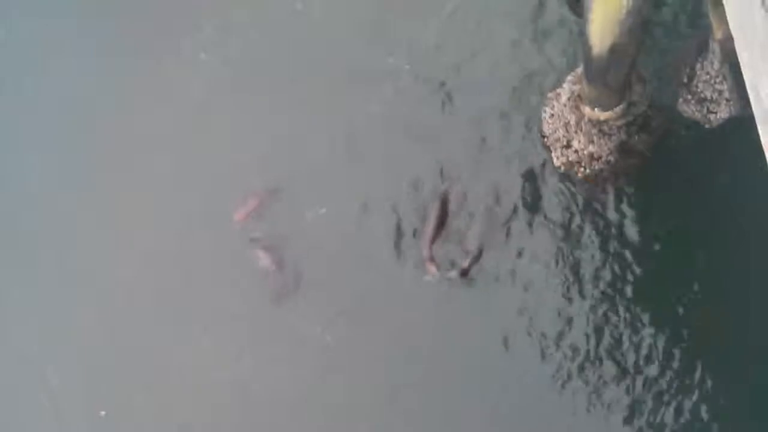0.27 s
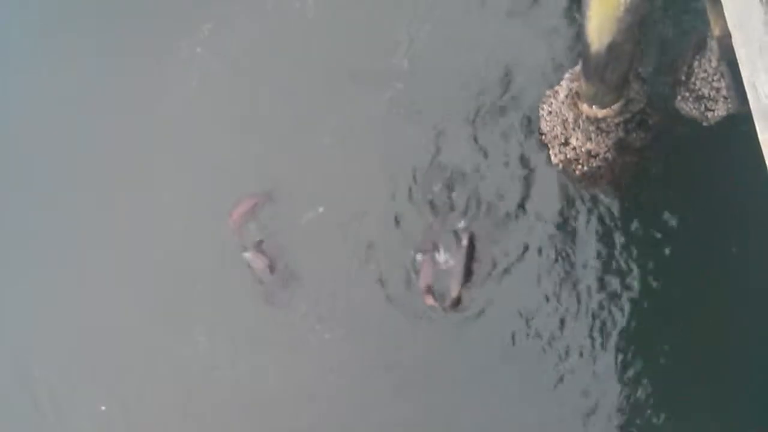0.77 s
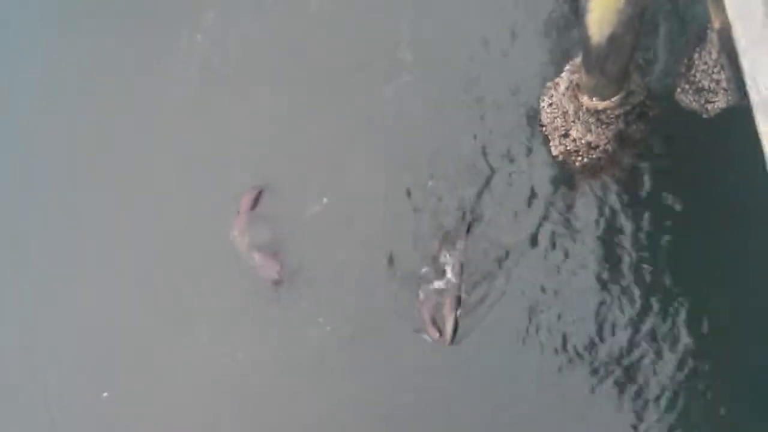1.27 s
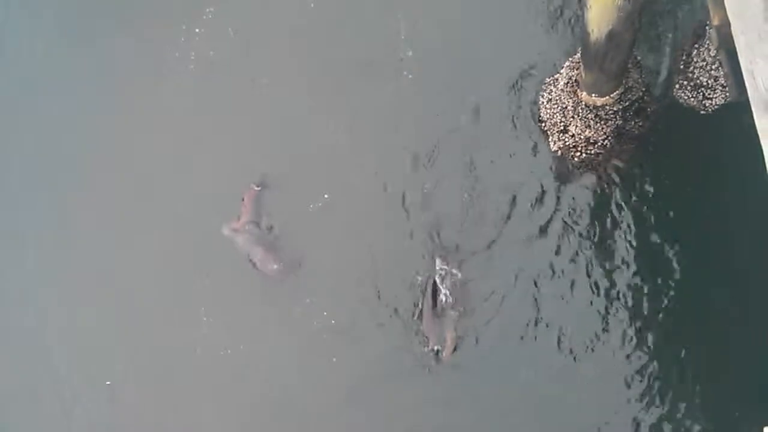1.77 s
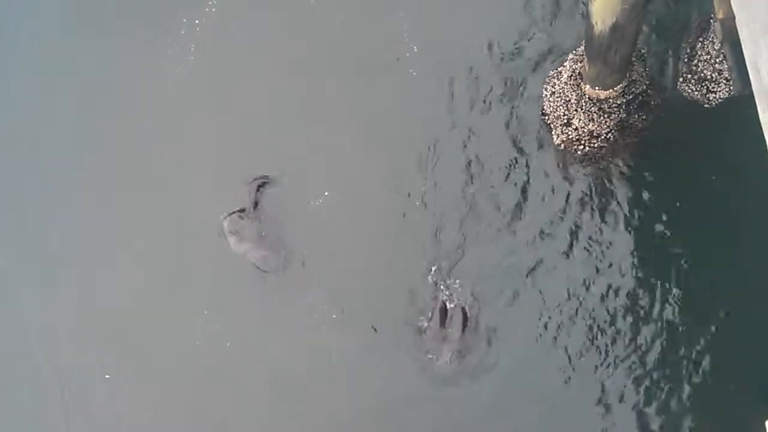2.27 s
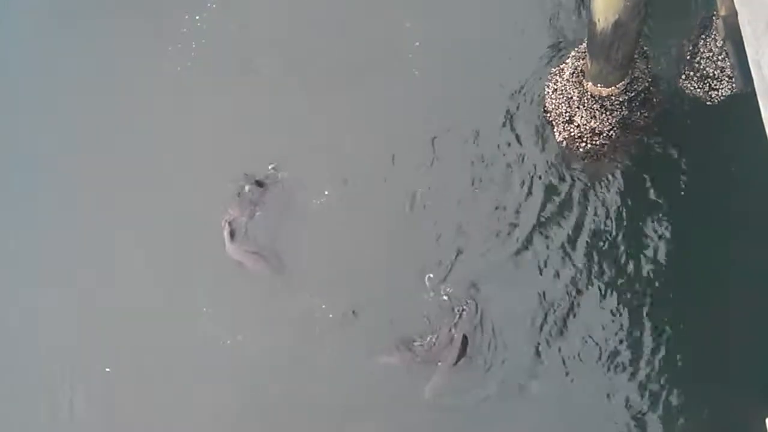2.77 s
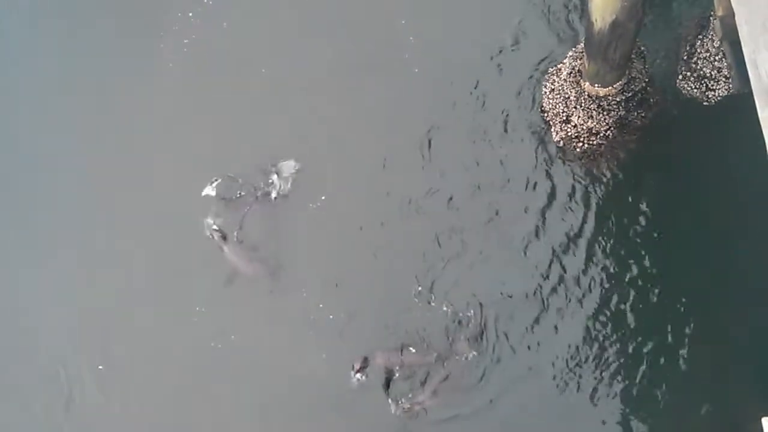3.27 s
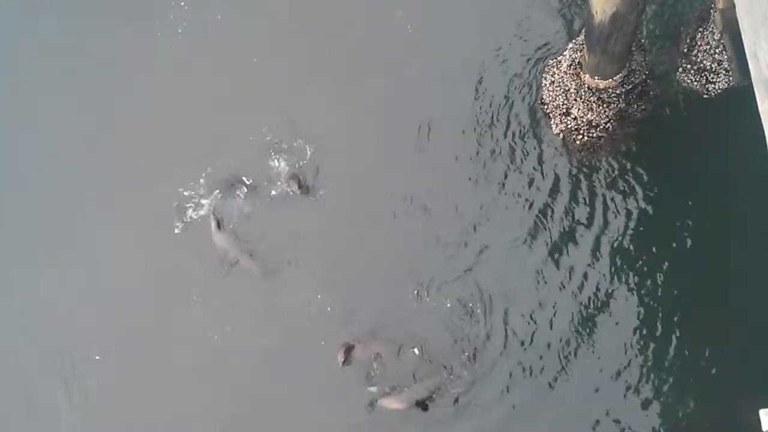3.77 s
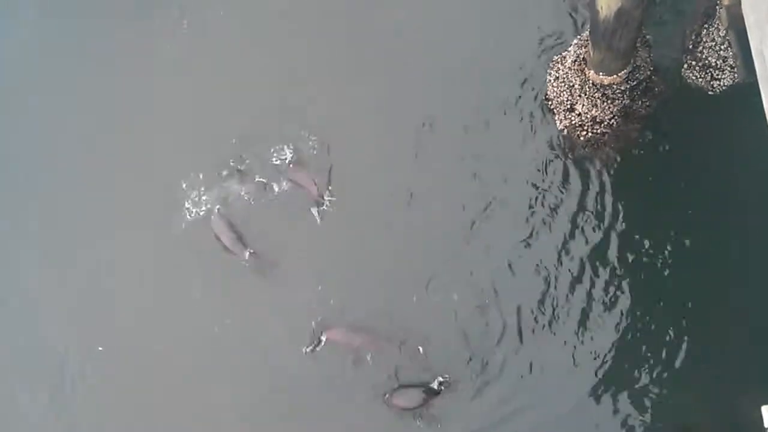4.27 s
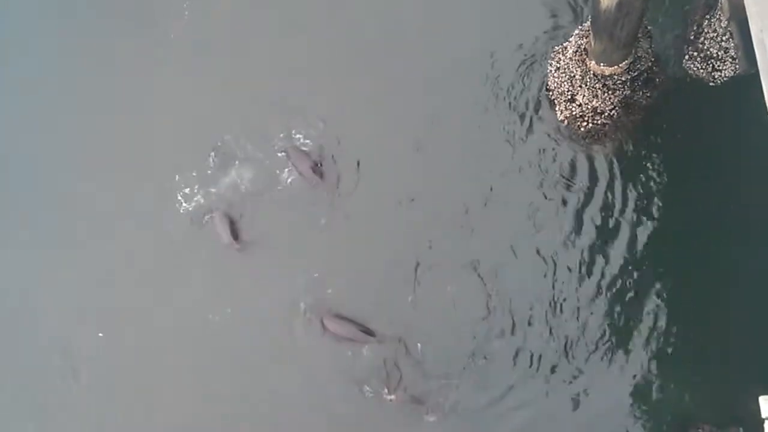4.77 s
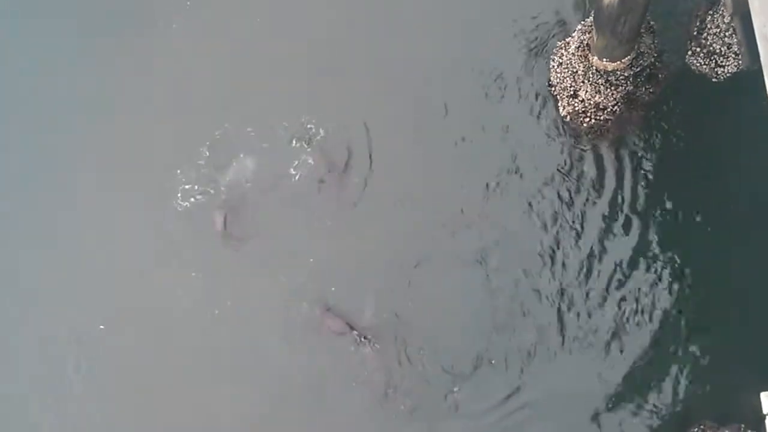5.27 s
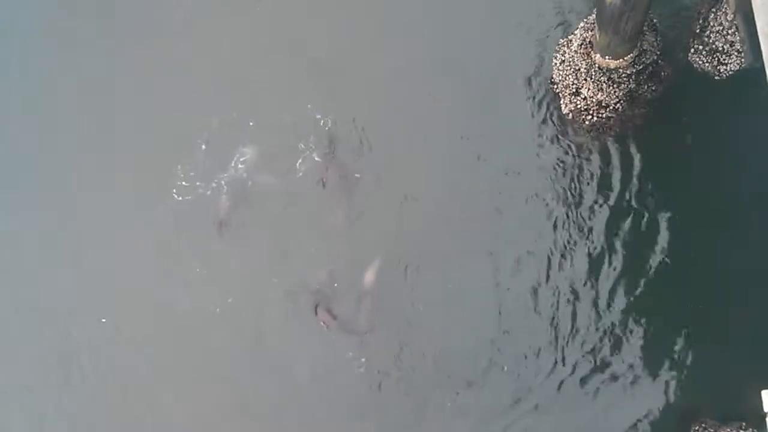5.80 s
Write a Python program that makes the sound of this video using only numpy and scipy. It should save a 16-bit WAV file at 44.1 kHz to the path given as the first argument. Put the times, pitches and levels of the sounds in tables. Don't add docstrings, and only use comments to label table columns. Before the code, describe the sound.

Small splashes and droplets under a pier, then one blaring mid-low horn tone that ducks partway through, followed by bubbling splashes and a wave slap.

```python
import sys
import numpy as np
from scipy import signal
from scipy.fft import rfft, irfft, next_fast_len
from scipy.io import wavfile
from scipy.ndimage import uniform_filter1d

SR = 44100
rng = np.random.default_rng(int(sys.argv[2]) if len(sys.argv) > 2 else 0)


def boost(x):
    u = np.asarray(x, float) / 20
    return 10 ** u


def generate_wav(signal):
    frames = np.transpose(np.atleast_2d(signal))
    scaled = np.clip(frames, -1, 1) * 32767
    pcm = np.round(scaled).astype(np.int16)
    wavfile.write(sys.argv[1], SR, pcm)


N = 266275
M = next_fast_len(N, True)
T = np.arange(N) / SR
HZ = np.fft.rfftfreq(M, 1 / SR)

# time_s, level_db
HUM_CURVE = [(.1, -57.5), (1.3, -48.5), (2.0, -58.5), (2.6, -65.5), (4.5, -70), (5.5, -57.5), (6.04, -68)]
# time_s, firing_hz, level_db
ENGINE_FIRST = [(.12, 157, -54), (.7, 154, -56), (.97, 152.9, -49.5), (1.12, 157.5, -53),
                (1.53, 169, -42.5), (1.66, 175.1, -55), (2.2, 187.3, -55.5), (2.6, 197, -70)]
ENGINE_SECOND = [(2.6, 122.3, -70), (2.75, 128, -58), (3.2, 136.3, -63.5), (3.49, 143, -51),
                 (3.84, 149.2, -46), (4.25, 154.2, -54)]
ENGINE_THIRD = [(4.4, 190, -54.5), (4.55, 178.7, -54.5), (4.83, 179.7, -55.5), (5.25, 178, -47.5),
                (5.53, 178.1, -49), (5.65, 181.8, -53.5), (6.04, 182.3, -51)]
# time_s, level_db
RUMBLE_CURVE = [(.3, -47.5), (1.11, -49.5), (1.4, -55), (2.1, -58.5), (3.3, -57.5), (3.51, -47),
                (3.66, -53), (4.3, -55), (4.7, -58), (6.04, -55.5)]
# freq_hz, density_db
RUMBLE_SPECTRUM = [(13, -59), (22, -29), (51, -13), (91, -5.5), (118, 0), (162, -3), (183, -11), (204, -7),
                   (320, -14), (420, -39.5), (700, -120)]
RUMBLE_UPPER_DB, RUMBLE_CALM_DB = -9.5, -71.5

# freq_hz, density_db
WATER_SPECTRUM = [(200, -30), (300, -0.5), (500, 0.5), (1000, -4.5), (1800, -10), (2150, -13), (3250, -20),
                  (4000, -13.5), (4800, -7.5), (5600, -14), (6600, -9.5), (7400, -5), (8400, -2),
                  (9200, -6.5), (11000, -12.5), (15800, -21.5)]
# peak_s, spray_db, dying_s, heaviness_db
SURFACINGS = [(.154, -51, 0.43, 6.5), (.407, -48, 0.095, 5), (.751, -58.5, .45, 12.5),
              (.925, -46.5, .185, 6), (1.098, -46.5, .14, 6.5), (1.253, -53, 0.12, 3.5),
              (1.4, -56.5, 0.11, -12), (2.2, -62.5, .1, 5), (2.879, -58, 0.17, -17),
              (3.077, -72.5, 0.058, 16), (3.13, -47, 0.14, -23), (3.23, -45.5, 0.27, 0.5),
              (3.37, -39, 0.17, -1.5), (3.616, -47, 0.098, -1), (3.743, -48, 0.14, 1.5),
              (3.829, -57, 0.055, 7), (4.08, -53, 0.15, -2), (4.19, -51.5, 0.34, -1),
              (4.291, -84.5, 0.28, 21), (4.382, -48, 0.052, 3), (4.68, -58.5, 0.11, -19.5),
              (4.8, -57.5, 0.071, -5), (4.88, -69, 0.27, 9), (5.215, -64.5, 0.049, 7.5),
              (5.476, -69.5, 0.13, 3), (5.55, -86, 0.67, 18.5), (5.695, -60.5, 0.16, -38.5),
              (5.797, -65, 0.12, -12.5)]
SURGE_RISE = .5
# surge_offset_db, lean_db_per_heaviness_db, trickle_offset_db, calm_db
WATER_BAND_LEVELS = [
    (-19, 1.966, -25, -73.5),
    (-9.5, 1.11, -25.5, -69.5),
    (-21.5, .6, -26, -87),
    (-8, 0.22, -26, -95.5),
    (-2, 0.036, -1, -79.5),
    (-12, .1, -8, -84),
]
# time_s, level_db
TRICKLE_CURVE = [(.1, -55.5), (1.5, -56), (2.3, -60), (3.0, -59), (4.5, -78), (5.1, -76), (6.04, -79.5)]
AIR_RUSH_DB = [-58, -58, -69]
CRACKLE_SHARE = 1.0

# start_s, length_s, pitch_hz, relative_db
FROTH_SWARMS = [(3.12, 0.042, 1150, -5.5), (3.22, 0.61, 1850, -0.5), (3.3, 0.18, 790, -32),
                (3.8, 0.18, 1530, 0), (1.9, .25, 6200, -15.5), (4.5, 0.26, 4300, -23),
                (3.05, 0.93, 3000, -7), (2.9, 0.74, 4800, -3), (4.82, 0.2, 1650, -13), (.85, .45, 5900, 9),
                (5.18, 0.26, 2000, -18.5), (0.34, 0.18, 1600, -2.5), (0.094, 0.18, 6000, 3.5),
                (0.32, 0.24, 6000, 4), (0.68, 0.05, 6300, -3), (1.08, 0.09, 5900, 2.5),
                (3.93, 0.27, 4700, -1.5), (3.3, .15, 4300, 8), (1.93, .03, 2600, -23.5),
                (2.05, 0.018, 3300, -20), (2.13, .02, 2750, -21.5), (1.6, .06, 2100, -13.5),
                (.12, .22, 1750, -5), (3.25, 0.33, 8300, 9.5), (3.56, .06, 1700, -5.5),
                (2.16, 0.11, 4700, -17), (4.8, .12, 2050, -18), (4.5, 0.14, 760, -14.5),
                (5.75, 0.22, 1100, -16), (.88, 0.08, 3000, -11), (4.04, 0.34, 8500, 4.5),
                (4.68, .13, 7700, -13), (3.7, .12, 8300, 3), (3.6, .1, 4900, -1), (4.2, .05, 4700, -14.5),
                (5.39, 0.043, 4500, -22)]
FROTH_DB, FROTH_PER_CYCLE = -55, .12

# start_s, peak_db, centre_hz
DROPLET_BURSTS = [(0.1295, -27.5, 8200), (0.2427, -31.5, 10160), (0.3704, -25, 7800), (0.384, -21.5, 8400),
                  (0.721, -29, 7570), (0.902, -18, 7700), (0.98, -27, 7600), (1.0646, -30, 8340),
                  (1.82, -17, 14000), (2.0555, -37.5, 8530), (2.0708, -36.5, 13910), (2.2427, -32, 7350),
                  (2.253, -33, 9120), (2.459, -31.5, 9680), (2.7502, -35.5, 8460), (2.8225, -22.5, 7340),
                  (2.823, -30, 4520), (2.899, -31, 9600), (3.2165, -24, 8190), (3.3292, -19.5, 8400),
                  (3.3291, -22.5, 6700), (3.471, -24.5, 12210), (3.4716, -23, 14500), (3.6616, -31.5, 5650),
                  (3.8678, -32, 7600), (4.11, -28.5, 8730), (4.147, -28, 7640), (4.3456, -32.5, 10050),
                  (4.366, -24.5, 8300), (4.47, -37, 8450), (4.7757, -35, 8040), (5.816, -35.5, 8650),
                  (0.244, -34.5, 4700), (.2979, -39, 11000), (0.384, -28, 5950), (.6038, -37, 8200),
                  (0.647, -48, 3050), (.699, -36, 6200), (.728, -34.5, 9600), (.9016, -28, 11500),
                  (.914, -26.5, 7920), (1.4142, -36, 11450), (1.428, -34, 7500), (1.82, -29, 9520),
                  (2.6061, -42, 10010), (2.917, -39.5, 11500), (3.0931, -35, 10500), (3.499, -32, 10800),
                  (3.508, -32, 10800), (3.5847, -32.5, 9800), (3.621, -33.5, 13000), (3.6607, -30, 8000),
                  (3.6609, -35.5, 12500), (3.6613, -38.5, 3150), (3.868, -33.5, 13000), (3.869, -35, 4870),
                  (3.942, -42.5, 4650), (4.11, -33, 5100), (4.1761, -35, 12000), (4.338, -36.5, 10500),
                  (4.366, -33.5, 13500), (4.7366, -39, 9900), (4.835, -44.5, 10600)]
# start_s, peak_db, centre_hz
MORE_DROPLET_BURSTS = [(3.0028, -45, 6900), (3.034, -41, 8300), (3.0617, -39.5, 4960), (3.1087, -36, 6750),
                       (3.108, -46, 2500), (3.2318, -36, 4400), (3.243, -29, 7500), (3.7207, -35, 6490),
                       (3.762, -34, 5870), (3.8619, -35, 4780), (3.8619, -36, 7000), (4.03, -41, 5970),
                       (4.0559, -41, 5050), (4.146, -38, 4650), (4.3388, -44, 4730), (1.68, -53, 5000),
                       (2.0557, -50, 3200), (2.0553, -48.5, 5500), (2.191, -48, 4700), (2.2524, -44.5, 4800),
                       (2.2427, -48, 4800), (2.535, -55, 4700), (2.6186, -49.5, 6460), (2.09, -40, 12500),
                       (2.459, -40, 12500), (4.5796, -48, 5000), (4.7241, -52, 3100), (5.1875, -53, 4900),
                       (5.4185, -57, 4570), (5.6365, -53, 6500), (5.6729, -53, 5670), (5.764, -57, 5080),
                       (0.646, -45.5, 2600), (.53, -39, 6800), (.878, -31, 5800)]
# start_s, peak_db
PILE_DRIPS = [(0.5912, -39), (0.7898, -32), (1.506, -41), (1.8205, -33.5), (1.8529, -36), (1.8776, -36),
              (1.9018, -40.5), (2.0868, -35), (2.113, -40), (2.129, -43.5), (2.1818, -34), (2.193, -43),
              (2.2783, -36.5), (2.4295, -43), (3.399, -29), (3.778, -31), (3.806, -31), (3.8549, -32),
              (4.03, -37), (4.178, -36), (4.25, -36), (4.6266, -39), (4.663, -41), (4.8597, -44),
              (4.897, -48.5), (5.21, -43), (5.6627, -42), (5.764, -46)]
DRIP_HZ, DROPLET_T60_S = 8600, 0.012
SNAP_CYCLES, SNAP_HISS_DB = 37, -6
# start_s, peak_db, centre_hz, t60_s
WATER_SHEETS = [(0.384, -33, 1650, 0.016), (.84, -39, 7120, 0.08), (3.335, -28.5, 7230, 0.092),
                (3.369, -24, 7860, 0.018), (3.4, -28, 6000, 0.067), (4.364, -35.5, 2580, 0.016),
                (4.368, -31, 5000, .04), (4.367, -26, 8560, 0.039)]
# start_s, peak_db, pitch_hz, t60_s
RINGING_BUBBLES = [(0.226, -34.5, 2640, 0.016), (.646, -33.5, 1510, 0.018), (.837, -32, 695, 0.027),
                   (.878, -27, 600, 0.0095), (1.037, -30.5, 1063, 0.041), (2.748, -37.5, 1849, 0.046),
                   (3.123, -39.5, 890, 0.044), (3.32, -36, 1320, 0.037), (3.345, -33, 1774, 0.035),
                   (3.367, -33.5, 1340, 0.052), (3.499, -36, 1400, 0.026), (3.599, -35.5, 1430, 0.047),
                   (3.716, -34, 960, 0.049), (4.059, -45, 1745, 0.036), (4.205, -38, 560.3, .04),
                   (4.291, -42.5, 1804, .037), (4.363, -31.5, 1255, 0.025), (4.367, -21.5, 570, 0.034),
                   (4.375, -29, 727, 0.034), (4.518, -48.5, 647, 0.063), (4.729, -40, 709, 0.092),
                   (5.307, -50, 1263, 0.029), (5.637, -35, 730, 0.04), (5.987, -44.5, 614, 0.036),
                   (.7, -36, 480, .03), (5.99, -47, 950, .04), (4.84, -48, 930, .05)]
# start_s, peak_db, pitch_hz
DROP_PINGS = [(2.3191, -49.5, 4620), (2.9243, -42, 4440), (4.5072, -40.5, 4630), (4.5605, -49, 4400),
              (4.5844, -43.5, 3950), (4.6149, -45, 4050), (4.7242, -46, 4440), (4.8978, -45, 3900),
              (5.1931, -47, 4750), (5.2495, -56, 4900), (5.4345, -46, 4440), (5.5463, -62, 4910),
              (5.7823, -50, 4680), (5.8157, -46, 3930)]
PING_T60_S, BUBBLE_RISE = 0.016, 0.066
# start_s, peak_db, pitch_hz, t60_s, edge_db
PILE_SLAPS = [
    (3.367, -23.5, 131, 0.074, -24),
    (4.205, -19.5, 129.2, 0.06, -3.5),
    (4.215, -38, 59.7, 0.18, -28.5),
]

# on_s, off_s, pitch_hz, sag_hz, sag_s
HORN_DRIVE = (1.0649, 3.0668, 417.36, 29.7, .03)
# time_s, offset_hz
DRIVE_SETTLING = [(1.06, 3.6), (1.11, 1.7), (1.2, .7), (1.58, .5), (1.66, 0.0), (3.1, 0.0)]
# order, level_db, duck_share, buildup_s
HORN_OVERTONES = [(3, -43.5, 1, 0.84), (4, -34.5, 0.8, 0.037), (6, -67, 0.32, .06), (8, -76.5, .4, .06),
                  (9, -75, .4, .06)]
HORN_DB = -6.6
# extra_path_m, level_db
REFLECTORS = [(3.494, -4.8), (9.555, -11.6), (13.903, -12.3), (21.724, -15.1), (26.035, -17.6),
              (34.727, -27), (48.058, -27.1)]
# start_s, peak_db, pitch_hz, t60_s
HOUSING_RINGS = [
    (1.068, -22, 332.3, 0.17),
    (2.21, -42.5, 519, 0.7),
    (3.3, -50, 417, .5),
    (3.065, -39, 520, .12),
]

# start_s, time_constant_s, depth_db
TONE_DUCK = (2.232, .095, -20.5)
# start_s, end_s, low_hz, high_hz, threshold_db, deepest_db
HISS_HOLES = [(1.45, 2.3, 4000, 5400, -88, -22), (2.3, 2.82, 4000, 5400, -93, -22),
              (2.3, 3.1, 2700, 4200, -92, -9), (2.86, 3.04, 5450, 5850, -82, -22),
              (4.45, 6.04, 2700, 4100, -97, -10)]
# pitch_hz, level_db
WHINE_TONES = [(15000, -69.5), (15583, -78)]
# time_s, level_db
WHINE_CURVE = [(0, -1), (4.3, 0), (5.1, -9), (6.04, -18)]
PEAK_LIMIT, START_S = .665, .1144


def columns(table):
    s, *values = np.transpose(table)
    return [np.interp(T, s, v) for v in values]


def walk(rate_hz):
    k = int(SR / rate_hz)
    steps = np.repeat(rng.standard_normal(N // k + 1), k)
    return 1.3 * uniform_filter1d(uniform_filter1d(steps, k), k)[:N]


def add(out, s, sound):
    i = int(s * SR)
    out[i:i + len(sound)] += sound[:N - i]


def decay(t, t60_s):
    return np.exp(-np.log(1000) * t / t60_s)


def power_sum(*levels_db):
    return 10 * np.log10(sum(boost(db) ** 2 for db in levels_db))


def banded(source, colour, edges, curves_db, flicker_db, flicker_hz):
    hz, db = np.transpose(colour)
    tilt_db = np.interp(np.log(HZ + 1), np.log(hz), db, -120, -120)
    spectrum = rfft(source / np.std(source), M) * boost(tilt_db)
    share_db = []
    for low, high in edges:
        energy = np.sum(abs(spectrum[(HZ > low) & (HZ < high)]) ** 2)
        share_db.append(10 * np.log10(2 * energy / M / N))
    place = 3 * np.log2((HZ + 1) / hz[0])
    rims = 3 * np.log2(np.ravel(edges) / hz[0])
    out = 0
    for k in range(int(3 * np.log2(hz[-1] / hz[0])) + 2):
        weights = [np.interp(k, rims, np.repeat(row, 2)) for row in np.eye(len(edges))]
        level_db = sum(w * (c - s) for w, c, s in zip(weights, curves_db, share_db) if w)
        band = irfft(spectrum * np.clip(1 - abs(place - k), 0, 1), M)[:N]
        out = out + band * boost(level_db + flicker_db * walk(flicker_hz))
    return out


def ducking():
    start_s, tau_s, depth_db = TONE_DUCK
    floor = boost(depth_db)
    return floor + (1 - floor) * np.exp(-np.clip(T - start_s, 0, None) / tau_s)


def rush_db(db):
    on_s, off_s = HORN_DRIVE[:2]
    return np.where((T > on_s) & (T < off_s), db + 20 * np.log10(ducking()), -120)


def rumble():
    low_db = columns(RUMBLE_CURVE)[0]
    upper_db = power_sum(low_db + RUMBLE_UPPER_DB, RUMBLE_CALM_DB, rush_db(AIR_RUSH_DB[0]))
    edges_hz = [(50, 160), (210, 240)]
    return banded(rng.standard_normal(N), RUMBLE_SPECTRUM, edges_hz, [low_db, upper_db], 1.6, 9)


def hum():
    b, a = signal.iirpeak(124, 9.0, fs=SR)
    tone = signal.lfilter(b, a, signal.lfilter(b, a, rng.standard_normal(N)))
    return boost(columns(HUM_CURVE)[0]) * tone / np.std(tone)


def engines():
    out = 0
    for table in (ENGINE_FIRST, ENGINE_SECOND, ENGINE_THIRD):
        hz, db = columns(table)
        audible = uniform_filter1d(1. * ((T > table[0][0]) & (T < table[-1][0])), size=3000)
        level = audible * boost(db + 0.76 * walk(11))
        phase = 2 * np.pi * np.cumsum(hz + 0.95 * walk(11)) / SR
        out = out + level * np.sqrt(2) * np.sin(phase)
    return out


def ring(pitch_hz, cycles=6.7):
    t = T[:int(40 * SR / pitch_hz)]
    swing = np.exp(-t * pitch_hz / cycles) * (1 - np.exp(-t * pitch_hz / 1.5))
    return swing * np.sin(2 * np.pi * pitch_hz * t * (1 + 4.2 * t))


def bubble_cloud(count, low_hz, span, range_db, cycles=6.7):
    out = np.zeros(N)
    for when, size, loss in rng.random((count, 3)):
        pitch_hz = low_hz * span ** size
        add(out, when * N / SR, pitch_hz * boost(-range_db * loss) * ring(pitch_hz, cycles))
    return out / np.std(out)


def water_levels():
    s, db, dying_s, heavy_db = np.transpose(SURFACINGS)
    coarse = T[::64]
    age = (coarse - s[:, None]) / dying_s[:, None]
    shape = np.where(age < 0, np.exp(-2 * (age / SURGE_RISE) ** 2), np.exp(-2 * np.clip(age, 0, None)))
    trickle = columns(TRICKLE_CURVE)[0]
    rushes_db = [*AIR_RUSH_DB[1:]] + [-120] * 4
    levels = []
    for (offset_db, lean, trickle_db, calm_db), air_db in zip(WATER_BAND_LEVELS, rushes_db):
        surge = np.interp(T, coarse, boost(db + offset_db + lean * heavy_db) ** 2 @ shape)
        surge_db = 10 * np.log10(surge + 1e-12)
        levels.append(power_sum(surge_db, trickle + trickle_db, calm_db, rush_db(air_db)))
    return levels


def splashing():
    sizes = boost(7.2 * np.minimum(rng.exponential(size=N), 1.45))
    struck = rng.random(N) < 2500 / SR
    bursts = struck * rng.standard_normal(N) * sizes * boost(3.0 * walk(60))
    bubbling = bubble_cloud(1500, 500, 6, 16)
    crackle = bubble_cloud(2600, 4000, 3.5, 24, cycles=5.3)
    bubbling = bubbling + CRACKLE_SHARE * crackle
    source = rng.standard_normal(N) + .45 * bursts / np.std(bursts) + .27 * bubbling
    gushes = boost(.8 * walk(30))
    edges_hz = [(520, 780), (900, 2100), (2700, 3400), (4000, 6000), (7000, 10000), (11500, 15500)]
    return banded(source * gushes, WATER_SPECTRUM, edges_hz, water_levels(), 1.8, 18)


def froth():
    out = np.zeros(N)
    for s, length_s, hz, db in FROTH_SWARMS:
        count = int(np.clip(FROTH_PER_CYCLE * length_s * hz, 6, 400))
        for a, b, c, d in rng.random((count, 4)):
            when_s = s + length_s * (2 * a + b) / 3
            level = boost(FROTH_DB + db + 8 - 14 * d) * np.sqrt(90 / count)
            add(out, when_s, level * ring(hz * (1 + .17 * (c - .5)), 13.0))
    return out


def cracks():
    out, t = np.zeros(N), T[:1500]
    snaps = [*DROPLET_BURSTS, *MORE_DROPLET_BURSTS]
    events = [(s, db + SNAP_HISS_DB, hz, DROPLET_T60_S) for s, db, hz in snaps]
    events += [(s, db, DRIP_HZ, DROPLET_T60_S) for s, db in PILE_DRIPS]
    events += [*WATER_SHEETS]
    for s, db, hz, t60_s in events:
        b, a = signal.butter(3, [0.81 * hz, min(1.208 * hz, 19000)], "band", fs=SR)
        swing = (1 - np.exp(-t / (0.044 * t60_s))) * decay(t, max(t60_s, .002))
        crack = signal.lfilter(b, a, rng.standard_normal(1500) * swing)
        add(out, s, boost(db - 3.0) * crack / abs(crack).max())
    return out


def snaps():
    out = np.zeros(N)
    for s, db, hz in [*DROPLET_BURSTS, *MORE_DROPLET_BURSTS]:
        turns = hz * T[:1500]
        swing = (1 - np.exp(-turns / 1.2)) ** 2 * decay(turns, SNAP_CYCLES)
        add(out, s, boost(db - 3.0) * swing / swing.max() * np.sin(2 * np.pi * turns))
    return out


def bubbles():
    out, t = np.zeros(N), T[:14000]
    pings = [(s, db, hz, PING_T60_S) for s, db, hz in DROP_PINGS]
    for s, db, hz, t60_s in [*RINGING_BUBBLES, *pings]:
        t60_s = max(t60_s, .005)
        swing = (1 - np.exp(-t / 0.00034)) * decay(t, t60_s)
        phase = 2 * np.pi * hz * (t + BUBBLE_RISE * t ** 2 / t60_s)
        add(out, s, boost(db - 5) * swing / swing.max() * np.sin(phase))
    return out


def slaps():
    out, t = np.zeros(N), T[:14000]
    for s, db, hz, t60_s, edge_db in PILE_SLAPS:
        overtone = 1.1 * boost(edge_db) * np.sin(2 * np.pi * 2.53 * hz * t) * np.exp(-t / 0.024)
        body = np.sin(2 * np.pi * hz * t) + overtone
        edge = boost(edge_db) * np.sin(2 * np.pi * 900 * t) * np.exp(-t / 0.0019)
        add(out, s, -boost(db) * (1 - np.exp(-t / 0.0029)) * (body * decay(t, t60_s) + edge))
    return out


def diaphragm(duck):
    on_s, off_s, pitch_hz, sag_hz, sag_s = HORN_DRIVE
    age = np.clip(T - on_s, 0, None)
    kick_hz = 45 * np.exp(-age / 0.0074)
    drive_hz = pitch_hz + columns(DRIVE_SETTLING)[0] - sag_hz * np.exp(-age / sag_s) - kick_hz
    phase = np.pi * np.cumsum(drive_hz) / SR
    swing = (1 - np.exp(-(age / 0.0083) ** 2)) * (1 - 0.54 * np.exp(-age / 0.037))
    swing = swing * np.exp(-(np.clip(T - off_s, 0, None) / .006) ** 2)
    tone = np.sin(2 * phase)
    for order, db, share, rise_s in HORN_OVERTONES:
        buildup = 1 - np.exp(-(age / rise_s) ** 2)
        tone = tone + boost(db) * buildup * duck ** (share - 1) * np.sin(order * phase)
    return swing * tone


def horn():
    duck = ducking()
    direct = diaphragm(duck)
    echoes = sum(boost(db) * np.interp(T - m / 343, T, direct) for m, db in REFLECTORS)
    far_shore = rng.standard_normal(SR // 2) * decay(T[:SR // 2], 0.67)
    tail = boost(-67.0) * signal.fftconvolve(direct, far_shore)[:N]
    flutter_db = 0.21 * walk(45) + 0.17 * walk(140) + 0.13 * walk(2.4)
    heard = np.sqrt(2) * boost(HORN_DB + flutter_db) * duck * (direct + echoes + tail)
    t = T[:SR]
    for s, db, hz, t60_s in HOUSING_RINGS:
        swing = (1 - np.exp(-t / (0.029 * t60_s))) * decay(t, t60_s)
        add(heard, s, boost(db) * swing * np.sin(2 * np.pi * hz * t))
    return heard


def scene():
    background = rumble() + hum() + engines()
    water = splashing() + froth() + cracks() + snaps() + bubbles() + slaps()
    return (background + water + horn())[None]


def suppress(x):
    hz, s, z = signal.stft(x, SR, nperseg=512)
    power = uniform_filter1d(uniform_filter1d(abs(z) ** 2, size=2, axis=1), size=9, axis=2)
    db = 10 * np.log10(abs(power) + 1e-20)
    gain_db = 0
    for start_s, end_s, low_hz, high_hz, edge_db, cut_db in HISS_HOLES:
        inside = np.outer((hz > low_hz) & (hz < high_hz), (s > start_s) & (s < end_s))
        gain_db = gain_db + np.clip(3 * (db - edge_db), cut_db, 0) * inside
    return signal.istft(z * boost(gain_db), SR, nperseg=512)[1][:, :N]


def whine():
    fade_db = columns(WHINE_CURVE)[0]
    return sum(boost(db + 5.0 + fade_db) * np.sin(2 * np.pi * hz * T + .6 * walk(20)) for hz, db in WHINE_TONES)


def limit(x):
    envelope = uniform_filter1d(abs(signal.hilbert(x)), size=100)
    return x * np.minimum(1, PEAK_LIMIT / (envelope + 1e-9))


def band_limit(x):
    return signal.sosfilt(signal.butter(12, 15850, fs=SR, output="sos"), x)


def record(dry):
    top = signal.ellip(10, .2, 90, 15800, fs=SR, output="sos")
    heard = suppress(limit(dry)) + whine()
    mix = signal.sosfilt(top, heard) * (T > START_S)
    return band_limit(mix)


dry = scene()
out = record(dry)
generate_wav(out)
```